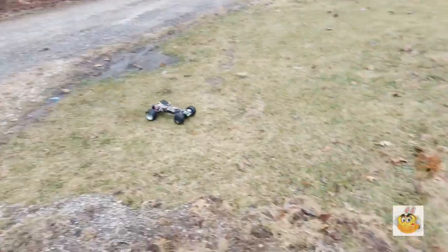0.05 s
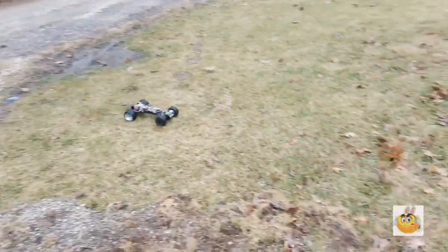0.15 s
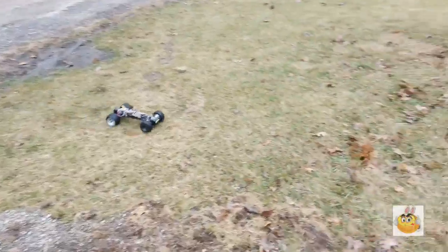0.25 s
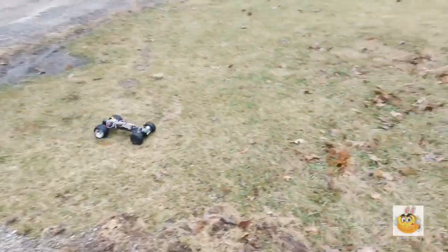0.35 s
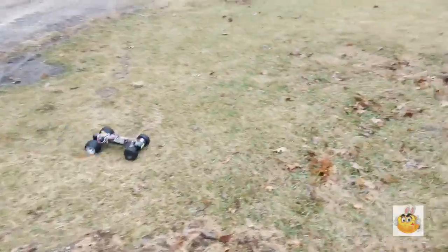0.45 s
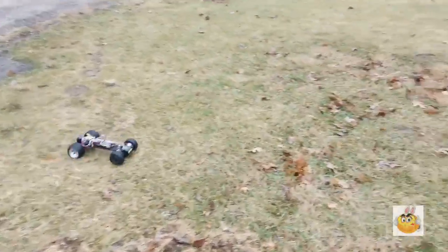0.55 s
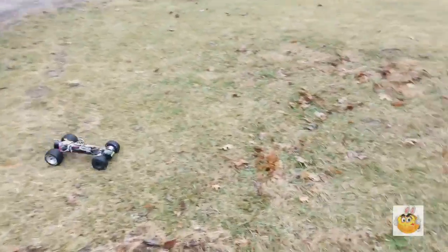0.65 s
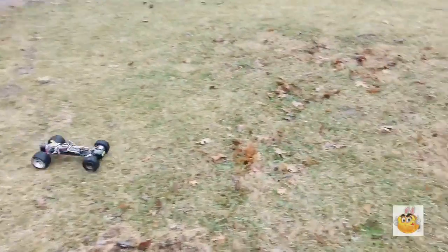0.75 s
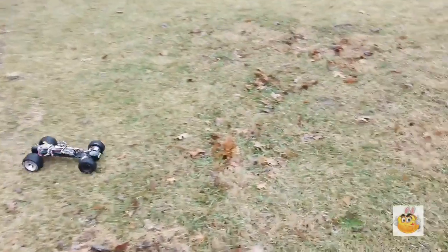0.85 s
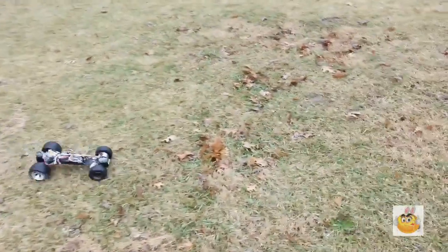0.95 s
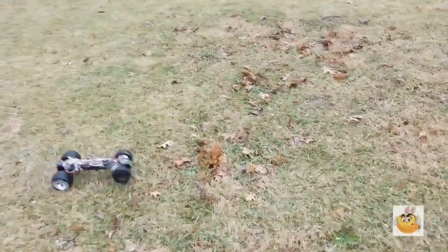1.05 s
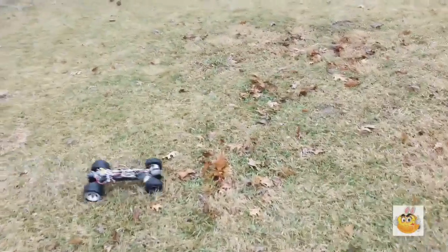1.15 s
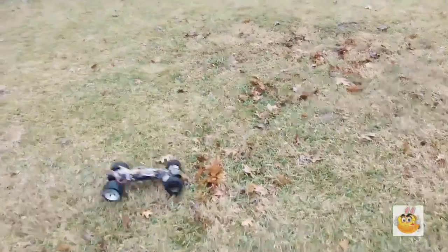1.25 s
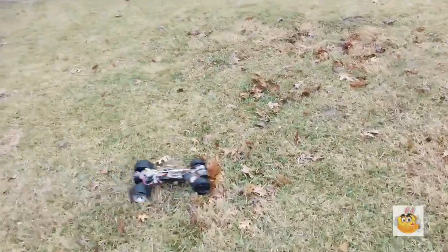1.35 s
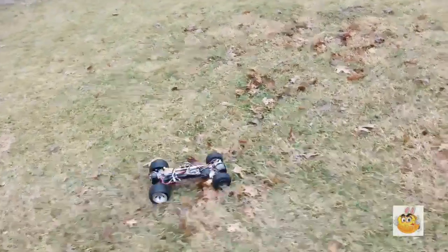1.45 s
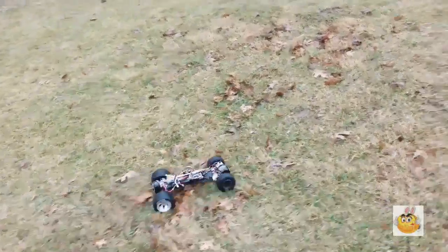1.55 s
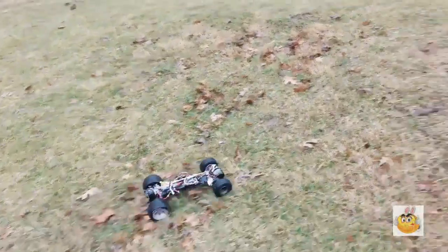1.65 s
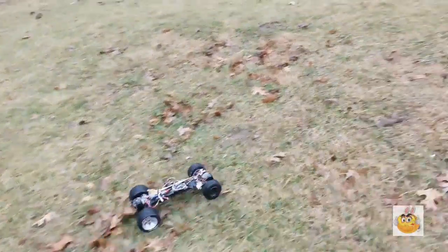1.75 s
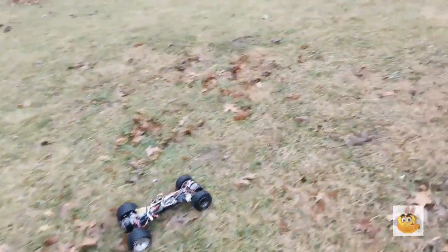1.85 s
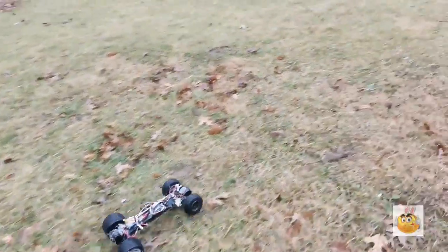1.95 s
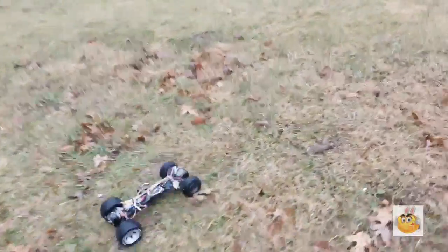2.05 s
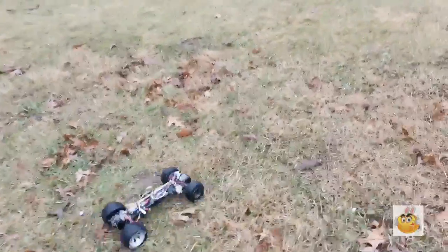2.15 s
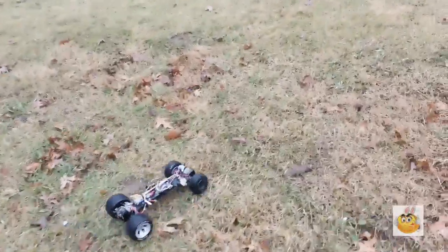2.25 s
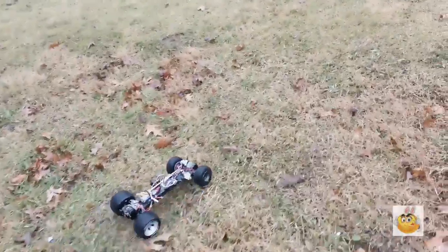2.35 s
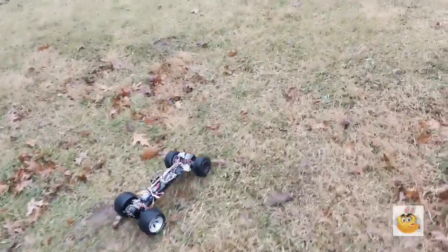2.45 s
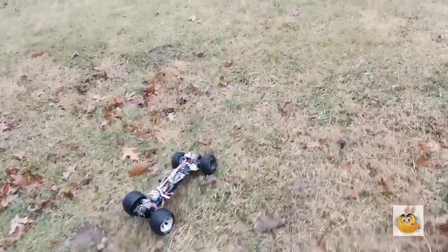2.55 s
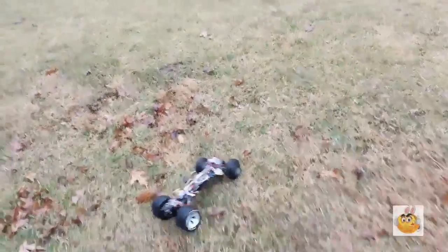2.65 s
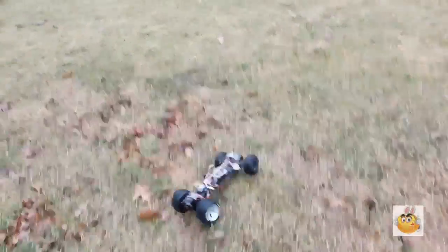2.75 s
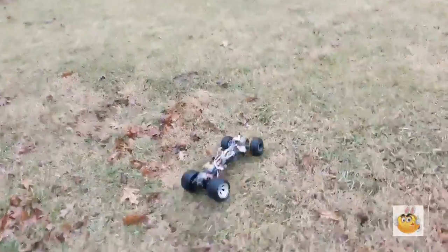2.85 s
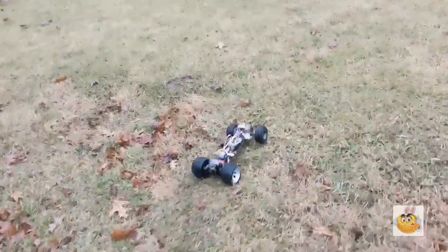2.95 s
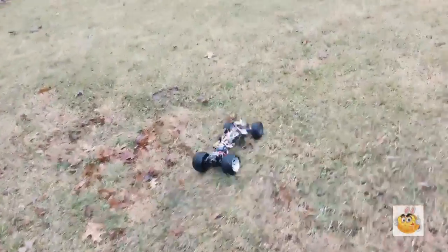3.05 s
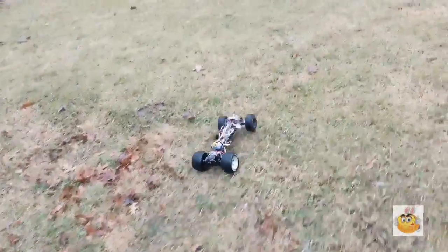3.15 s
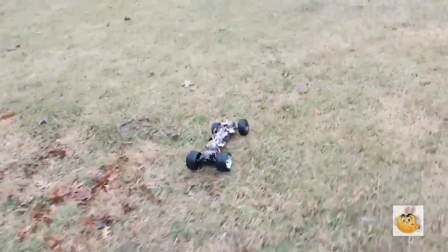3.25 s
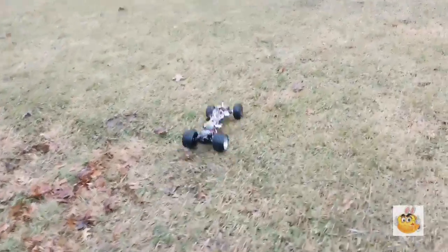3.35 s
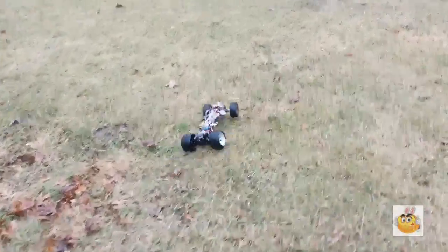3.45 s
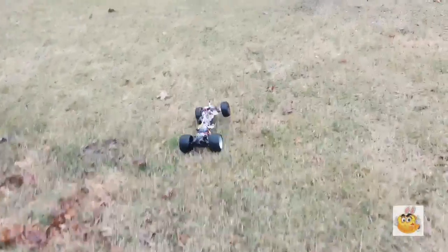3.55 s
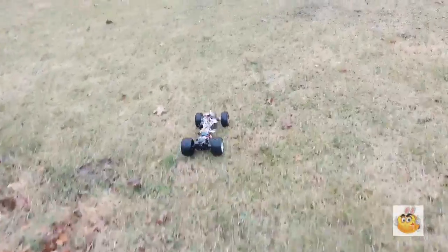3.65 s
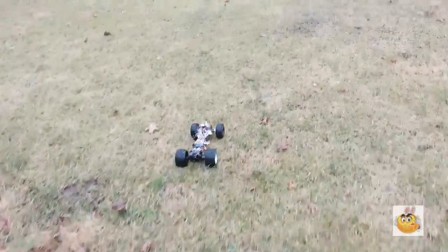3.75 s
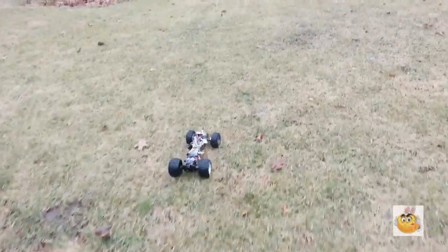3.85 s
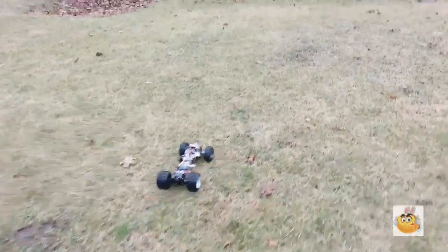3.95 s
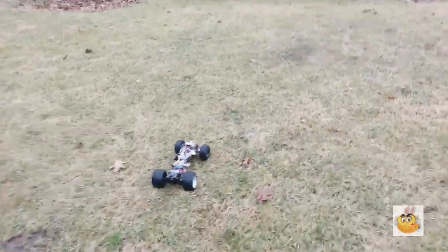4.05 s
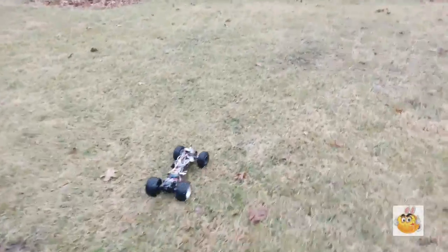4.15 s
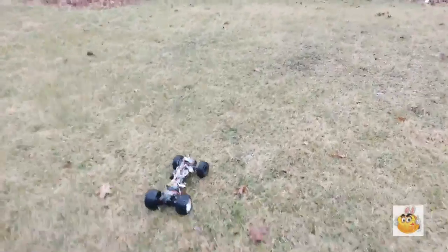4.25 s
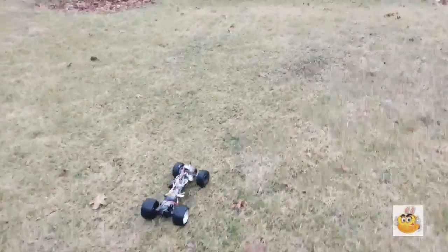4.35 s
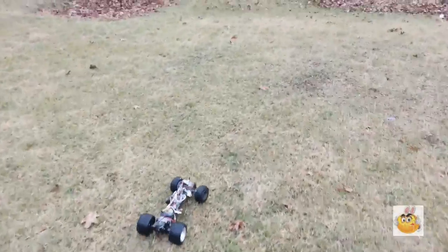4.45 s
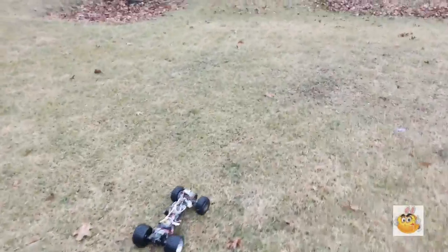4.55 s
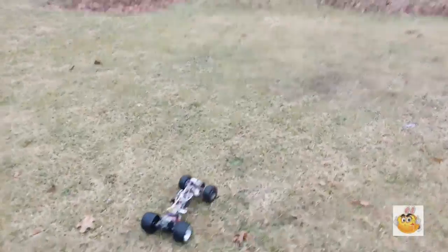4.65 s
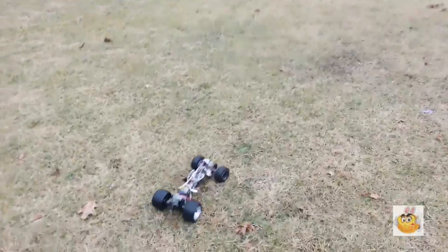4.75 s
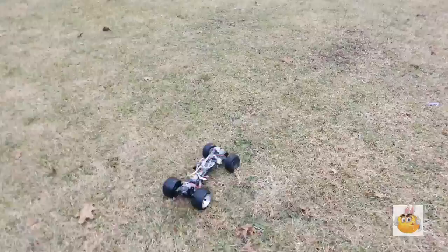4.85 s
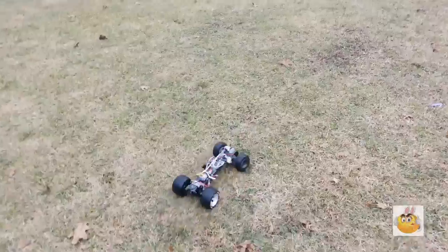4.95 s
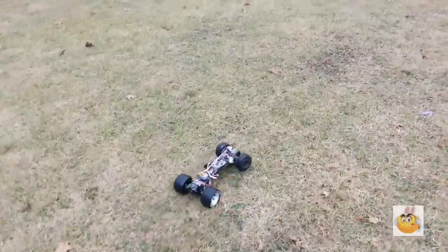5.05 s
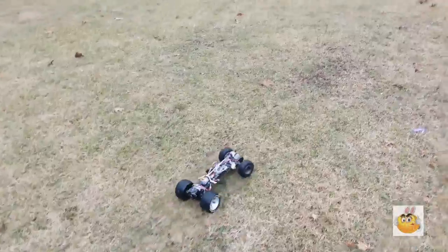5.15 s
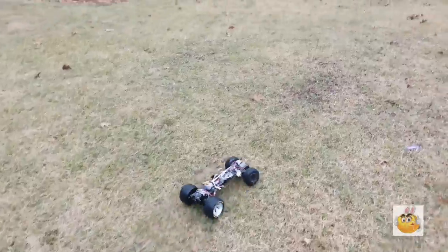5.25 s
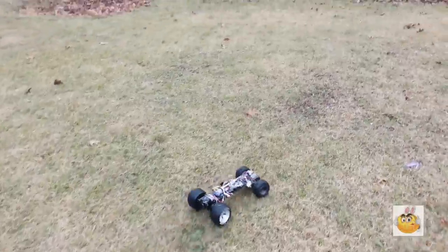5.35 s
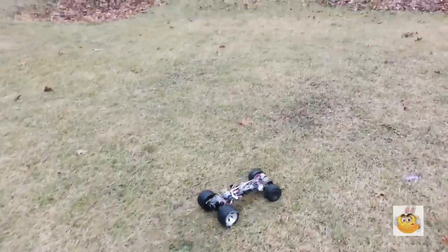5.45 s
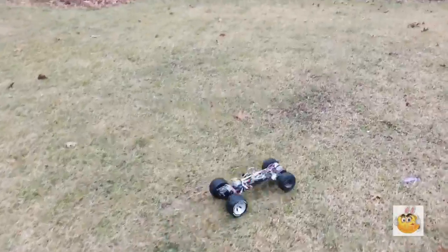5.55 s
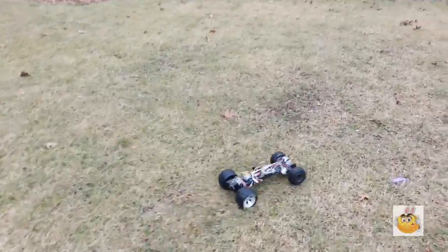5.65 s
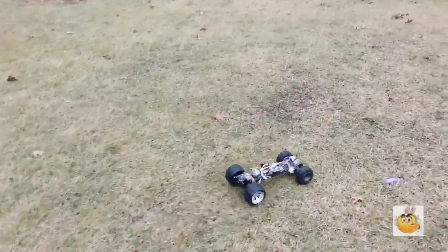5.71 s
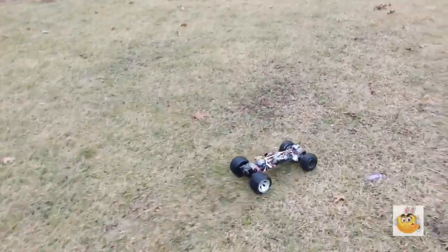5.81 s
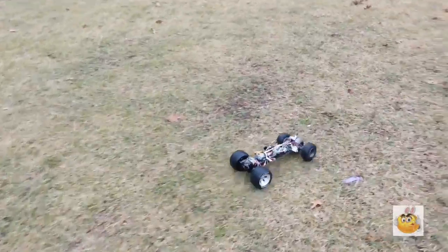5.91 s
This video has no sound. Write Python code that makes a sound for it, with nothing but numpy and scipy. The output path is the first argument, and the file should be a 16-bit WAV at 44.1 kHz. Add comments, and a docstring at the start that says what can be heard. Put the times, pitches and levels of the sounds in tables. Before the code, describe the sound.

A toy-sized electric truck bounces across rough grass. Plastic gears scrape harshly while the motor pitch leaps briefly whenever wheels slip on bumps, with small grit ticks. After its strongest revving it coasts down and almost stops over low, quiet outdoor rumble, then restarts suddenly. Open-air stereo pickup, dry, slightly left, with a brittle ringing edge on the right.

```python
"""Electric model truck on a lawn

A small electric truck bounces over the grass, coasts to a stop and pulls away again.
The motor whines mostly on even orders of its shaft; filtered noise in shaft-timed bursts makes the gear rasp.
Near standstill the speed controller sings faintly over a low outdoor rumble, and a soft hiss passes.
The right microphone port rings in the treble."""
import sys
import numpy as np
from scipy import signal
from scipy.fft import rfft, irfft
from scipy.io import wavfile
from scipy.ndimage import uniform_filter1d, map_coordinates

SR = 44100
rng = np.random.default_rng(int(sys.argv[2]) if len(sys.argv) > 2 else 0)


def unload_wav(signal):
    """Save mono or channel-first audio to the path in sys.argv[1] as 16-bit WAV at rate SR, clipped to [-1, 1]."""
    wavfile.write(
        sys.argv[1],
        SR,
        np.round(np.clip(np.atleast_2d(signal).T, -1, 1) * 32767).astype(np.int16),
    )


N = 263718
TIME = np.arange(N) / SR
FREQS = np.fft.rfftfreq(N, 1 / SR)


def from_db(db):
    """Decibels to gain."""
    return 10 ** (np.asarray(db) / 20)


def unit(x):
    """Scales to an rms of one."""
    return x / np.sqrt(np.mean(x ** 2) + 1e-20)


def follow(table, t=TIME):
    """Columns of a curve table, interpolated at the times t."""
    s, *columns = np.transpose(table)
    return [np.interp(t, s, c) for c in columns]


def at_pitch(table, hz):
    """Reads a spectrum on a log-frequency axis."""
    f, value = np.transpose(table)
    return np.interp(np.log(hz + 1), np.log(f), value)


def colour(x, table):
    """Filters by a spectrum in dB."""
    return irfft(rfft(x) * from_db(at_pitch(table, FREQS)), N)


def wander(rate_hz):
    """Random curve of rms one, low-passed near the given rate."""
    spectrum = rfft(rng.standard_normal(N))
    return unit(irfft(spectrum / (1 + (FREQS / rate_hz) ** 4), N))


def two_sides(likeness):
    """Two noises, alike to a degree set per frequency."""
    a, b = rfft(rng.standard_normal((2, N)))
    c = np.clip(at_pitch(likeness, FREQS), 0, 1)
    right = c * a + np.sqrt(1 - c ** 2) * b
    return irfft(np.array([a, right]), N)


# outdoor background spectrum: freq_hz, relative_level_db
AIR_SPECTRUM = [(20, -37), (32, -25), (50, -14), (86, 1), (110, -2), (129, 2), (160, -3), (250, -7),
                (430, -11), (800, -11), (1800, -16), (3200, -20), (7000, -24), (10000, -28), (13000, -33)]
# likeness of its two sides: freq_hz, likeness_0_to_1
AIR_LIKENESS = [(30, 0.26), (90, 1), (200, 0.86), (500, 0.46), (1500, 0.24), (5000, 0.022)]


def outdoors(level_db=-42, swell_db=2.0, swell_hz=7.1):
    """Distant rumble and a faint wash of open air: coloured noise with random swells."""
    air = unit(colour(two_sides(AIR_LIKENESS), AIR_SPECTRUM))
    return air * from_db(level_db + swell_db * wander(swell_hz))


def swish(level_db=-43):
    """A soft bright hiss while the truck stands: coloured noise under a short swell."""
    # freq_hz, relative_level_db
    spectrum = [(400, -10), (2000, 0), (5000, 3), (7000, -6.5), (10000, -7), (13000, -11)]
    # time_s, relative_level_db
    swell = [(4.5, -63), (4.57, -17), (4.61, 4), (4.66, 4.5), (4.7, -14), (4.78, -64)]
    hiss = unit(colour(rng.standard_normal((2, N)), spectrum))
    return hiss * from_db(level_db + follow(swell)[0])


# wheel slips on humps: crest_s, extra_turns_per_s, half_length_s, extra_whine_db
WHEEL_SLIPS = [(.06, 55, .075, 7), (.975, 100, .035, 0), (1.07, 70, .055, 0), (1.185, 125, .055, -2),
               (1.33, 115, .035, 0), (1.495, 105, .04, 0), (1.615, 135, .058, 2), (1.72, 75, .035, 2),
               (1.79, 55, .028, 0), (1.99, 85, .055, -1), (2.15, 70, .055, 3), (2.45, 65, .06, 5),
               (2.565, 230, .042, 1), (2.655, 180, .038, 0), (2.707, 215, .03, 5), (2.795, 115, .048, 7),
               (2.9, 190, .058, 5), (2.992, 255, .038, 4), (3.1, 230, .06, 5), (3.175, 130, .03, 4),
               (3.265, 130, .04, 6), (3.36, 190, .035, 7), (3.495, 130, .03, 1), (3.542, 175, .04, 1),
               (3.69, 55, .06, 0), (4.875, 95, .055, 4), (5.12, 45, .04, 7), (5.2, 70, .035, 3),
               (5.295, 50, .04, 4), (5.425, 115, .048, 3), (5.58, 90, .05, 6), (5.715, 70, .045, 1),
               (5.81, 50, .028, 1), (5.922, 115, .05, 3)]
SLIP_ARCH = 1.6  # exponent: 1 pointed crest, 2 round


def whoops():
    """Each slip is one arch that lifts shaft speed and whine: (turns per second, dB)."""
    crest_s, extra_turns, half_length_s, whine_db = np.transpose(WHEEL_SLIPS)[:, :, None]
    arch = 1 - np.minimum(abs(TIME - crest_s) / half_length_s, 1) ** SLIP_ARCH
    return np.max(extra_turns * arch, axis=0), np.sum(whine_db * arch, axis=0)


# motor shaft while the wheels grip: time_s, turns_per_s
GRIP_SPEED = [(0, 555), (.14, 510), (.33, 490), (.72, 390), (.94, 395), (1.38, 505), (1.55, 480),
              (1.94, 465), (2.09, 435), (2.21, 365), (2.36, 365), (2.61, 415), (2.84, 515), (3.03, 560),
              (3.25, 680), (3.375, 610), (3.4, 450), (3.425, 600), (3.6, 470), (3.78, 370), (4.1, 295),
              (4.41, 80), (4.75, 80), (4.81, 400), (4.95, 330), (5.16, 420), (5.34, 445), (5.39, 375),
              (5.63, 360), (5.67, 480), (5.98, 455)]
SWAY_SHARE, SWAY_HZ = .018, 18  # rough lawn
TREMBLE_SHARE, TREMBLE_HZ = .011, 60  # gear play


def shaft():
    """Shaft speed from throttle, wheel slips, lawn sway and gear tremble; its integral is the angle."""
    unevenness = 1 + SWAY_SHARE * wander(SWAY_HZ) + TREMBLE_SHARE * wander(TREMBLE_HZ)
    speed = (follow(GRIP_SPEED)[0] + whoops()[0]) * unevenness
    return speed, 2 * np.pi * np.cumsum(speed) / SR


def racing_db(speed):
    """How far the shaft runs above its mean speed over the surrounding 0.2 s."""
    return 20 * np.log10(speed / uniform_filter1d(speed, size=8800, mode="nearest"))


def spinning(speed, stall_turns_per_s=260):
    """Near one while the shaft turns freely, falling to zero at rest."""
    return 1 / (1 + (stall_turns_per_s / speed) ** 6)


# hard bumps that load (+) or unload (-) the gears: time_s, change_db, half_length_s
JOLTS = [(0.084, 3.5, 0.014), (0.341, -5, 0.0086), (1.474, -8, 0.0057), (1.611, 4.5, 0.0049),
         (1.66, 6.5, 0.01), (1.814, 5, 0.012), (2.059, -5, 0.016), (2.372, -5.5, 0.026),
         (2.491, -8.5, 0.025), (2.599, -8, 0.011), (2.687, -3.5, 0.0089), (3.197, 4.5, .0093),
         (3.286, 4, 0.0092), (3.336, 7, 0.0059), (3.373, 7.5, 0.0085), (3.404, 6, 0.0079),
         (3.45, 7.5, 0.0073), (3.836, -12, 0.0023), (3.977, 6, 0.0097), (4.466, 10, 0.0057),
         (5.573, 5, 0.012), (5.639, -1, 0.006)]
JUDDER_DB, JUDDER_HZ = 1.5, 28  # small random bumps, rms


def surge_db(speed, power=0.46):
    """Quick changes of effort: racing shaft, hard bumps and a judder of small ones."""
    bumps = 0
    for time_s, db, half_length_s in JOLTS:
        bumps = bumps + db * np.exp(-np.minimum(((TIME - time_s) / half_length_s) ** 2, 20))
    return power * racing_db(speed) + bumps + JUDDER_DB * wander(JUDDER_HZ)


# switching tone: freq_hz, rms_db at standstill
SWITCHING_TONES = [(980, -54.5), (1960, -66)]


def controller(speed, blur_rad=0.34, blur_hz=23):
    """The speed controller's pulses sing in the windings while the shaft is nearly still."""
    tone = 0
    for hz, db in SWITCHING_TONES:
        phase = 2 * np.pi * hz * TIME + blur_rad * wander(blur_hz)
        tone = tone + from_db(db) * unit(np.sin(phase))
    return tone * (1 - spinning(speed))


# likeness of the two sides for rasp and ticks: freq_hz, likeness_0_to_1
RASP_LIKENESS = [(150, 0), (500, 0.13), (2300, 0.96), (4000, 0.55), (7000, 0.36), (12000, 0.08)]
# radiation of gear case and chassis: freq_hz, gain_db
CHASSIS_RADIATION = [(100, -17.5), (300, -16.5), (550, -14), (900, -11.5), (1400, -12), (2200, -6.5),
                     (2750, 3), (3400, -2.5), (4600, 1.5), (5900, -3), (6800, -3), (8000, -10.5),
                     (9600, -12.5), (11000, -19), (12600, -21.5), (13800, -66)]
# grit and stalks on the chassis: start_s, relative_level_db
GRIT_TICKS = [(1.5958, -15), (2.6199, -10), (2.6597, -5), (3.9754, -18), (4.1762, -22), (4.2143, -18),
              (5.3308, -6), (5.5834, -13)]


def ticks(level_db=-3, decay_s=.0006):
    """Grit and stalks tap the chassis: short decaying noise, coloured by what it radiates."""
    taps = np.zeros(N)
    for start_s, db in GRIT_TICKS:
        age_s = np.maximum(TIME - start_s, 0)
        taps += from_db(db + level_db) * (age_s > 0) * np.exp(-np.minimum(age_s / decay_s, 20))
    return colour(two_sides(RASP_LIKENESS) * taps, CHASSIS_RADIATION)


# rasp colour as the truck turns: time_s, body_db, ring_near_2700_hz_db, low_treble_db
FACING = [(0, -1.5, -2, 0.5), (.3, -3, 2.5, 0), (.85, 1, 2, -1.5), (1.35, 0.5, 0.5, 3.5),
          (1.9, 0, -5, -0.5), (2.4, 0, -1.5, 3), (3.6, 1, -4, -2.5), (4.1, 5.5, -1, 0), (4.85, 11.5, 5, 2),
          (5.1, 0, 0, -0.5), (5.98, 1, -1.5, -3.5)]


def turn_colour(x, patch_db=2.2):
    """Broad bands swell and fade as the truck turns; random patches of time and pitch vary gently in level."""
    hz, t, z = signal.stft(x, SR, nperseg=512)
    # per band: freq_hz, share
    body = [(1800, 1), (2500, 0)]
    ring = [(2000, 0), (2700, 1), (3400, 0)]
    low_treble = [(3400, 0), (4100, 1), (5400, 1), (6500, 0)]
    tilt_db = 0
    for shape, db in zip([body, ring, low_treble], follow(FACING, t)):
        tilt_db = tilt_db + at_pitch(shape, hz)[:, None] * db
    patches = uniform_filter1d(rng.standard_normal(z.shape[1:]), size=3, axis=0)
    patches_db = patch_db * unit(uniform_filter1d(patches, size=5, axis=1))
    return signal.istft(z * from_db(tilt_db + patches_db), SR, nperseg=512)[1][:, :N]


# drive train loudness, from throttle and distance: time_s, relative_level_db
DRIVE_LOAD = [(0, -24), (.9, -22.5), (1.5, -19), (2.1, -17), (2.25, -22.5), (2.4, -19.5), (2.68, -14),
              (2.85, -15.5), (3.1, -13.5), (3.35, -20.5), (3.6, -19), (3.97, -24.5), (4.3, -37),
              (4.42, -51), (4.77, -41), (4.8, -34.5), (5.05, -19.5), (5.55, -19.5), (5.98, -17.5)]


def gears(angle, surge, level_db=-4.5, wobble=0.13, mesh=0.24, chatter_db=0.0, chatter_hz=260,
          body_share=0.5, body_hz=1500):
    """Teeth scrape in bursts, once and twice a shaft turn; the chassis colours the rasp."""
    chatter = from_db(chatter_db * wander(chatter_hz))  # flat at 0 dB
    bursts = (1 + wobble * np.cos(angle) + mesh * np.cos(2 * angle)) * chatter
    scrape = two_sides(RASP_LIKENESS) * bursts
    rasp = turn_colour(unit(colour(scrape, CHASSIS_RADIATION)))
    # low body follows surges less than the scraping treble
    body = irfft(rfft(rasp) / (1 + (FREQS / body_hz) ** 4), N)
    rasp = body * from_db(body_share * surge) + (rasp - body) * from_db(surge)
    return rasp * from_db(level_db + follow(DRIVE_LOAD)[0])


# bounce off the ground: time_s, delay_ms, strength
GROUND_BOUNCE = [(.05, .1, 0), (.25, .15, .45), (.6, .19, .45), (.9, .215, .4), (1.2, .235, .3),
                 (1.6, .27, 0)]


def ground_echo(x):
    """A slightly later copy off the lawn combs the sound; the comb slides down as the truck nears."""
    delay_ms, strength = follow(GROUND_BOUNCE)
    late = np.arange(N) - delay_ms * SR / 1000
    echo = np.array([map_coordinates(side, [late], order=3) for side in x])
    return (x + strength * echo) / np.hypot(1, strength)


def partial(angle, blur_rad, shimmer_db=3.8):
    """One shaft order, broken up in level and phase by the uneven contact of the teeth."""
    shimmer = from_db(shimmer_db * wander(45))
    return unit(shimmer * np.cos(angle + blur_rad * wander(67)))


def ringing(x, share=.4, decay_s=.003):
    """Plastic parts ring on for milliseconds, so a sweeping tone flickers differently on each side."""
    age_s = np.arange(1024) / SR
    rings = rng.standard_normal((2, len(age_s))) * np.exp(-age_s / decay_s)
    rings /= np.linalg.norm(rings, axis=1, keepdims=True)
    tail = signal.oaconvolve(x[None], rings, axes=1)[:, :N]
    return (x + share * tail) / np.hypot(1, share)


# whine against the drive train loudness: time_s, relative_level_db
WHINE_LEVEL = [(0, -21), (.2, -19), (.5, -25), (1.1, -23), (1.6, -14.5), (2.35, -18), (2.7, -15.5),
               (3.1, -19.5), (3.5, -17), (3.9, -24), (4.85, -19), (5.3, -18), (5.98, -20)]
# even orders on the mount: shaft_order, relative_level_db at MID_TURNS_PER_S, rise_db_per_doubling
MOUNT_ORDERS = [(2, -8, 9), (4, -.5, 9), (6, 0, -6)]
# fringe of further orders: shaft_order, relative_level_db
FRINGE_ORDERS = [(3, -8.5), (5, -37), (7, -14), (8, -29), (10, 1), (12, -17.5)]
# motor mount resonances: freq_hz, gain_db
MOUNT_RESONANCE = [(700, 5), (1150, -1), (1330, -2), (1550, 1), (1800, -2), (2150, 2), (2400, 3), (2680, 7),
                   (3100, -5), (4000, -5)]
MID_TURNS_PER_S = 500


def motor(speed, angle, surge, fringe_db=-2):
    """Three even orders follow the mount resonances, with a fringe of further orders; crests sing out."""
    doublings = np.log2(speed / MID_TURNS_PER_S)
    whine = 0
    for order, db, rise_db in MOUNT_ORDERS:
        order_db = db + rise_db * doublings + at_pitch(MOUNT_RESONANCE, order * speed)
        whine = whine + from_db(order_db) * partial(order * angle, blur_rad=.35)
    for order, db in FRINGE_ORDERS:
        whine = whine + from_db(db + fringe_db) * partial(order * angle, blur_rad=0.7)
    effort_db = whoops()[1] + .8 * np.minimum(racing_db(speed), 2) + .3 * surge - 1.2
    level_db = follow(DRIVE_LOAD)[0] + follow(WHINE_LEVEL)[0] + effort_db
    return ringing(whine * spinning(speed) * from_db(level_db))


# truck position: time_s, left_minus_right_db, left_delay_ms
TRUCK_PLACE = [(0, 3, 0.086), (.7, 2.5, 0.16), (1.8, 2.5, 0.1), (2.6, 3, 0.13), (3.2, 3.5, 0.052),
               (3.8, 3, 0.07), (4.8, 3.5, 0.089), (5.9, 4, 0.022)]


def place(x):
    """Pans the truck by level and lets it reach the left side a little later."""
    pan_db, delay_ms = follow(TRUCK_PLACE)
    left = map_coordinates(x[0], [np.arange(N) - delay_ms * SR / 1000], order=3)
    return np.array([left * from_db(pan_db / 2), x[1] * from_db(-pan_db / 2)])


def scene():
    """The truck on the lawn, over the outdoor background."""
    background = outdoors() + swish()
    speed, angle = shaft()
    surge = surge_db(speed)
    rasp = ground_echo(ticks() + gears(angle, surge))
    truck = controller(speed) + rasp + motor(speed, angle, surge)
    return background + place(truck)


# right microphone port against the left: freq_hz, gain_db
RIGHT_PORT = [(300, 1), (1500, 2.35), (2300, 0), (3200, -4), (4100, -1), (5300, 2.8), (6100, 7),
              (6650, 16.5), (7250, 19), (7700, 12.5), (8400, 9), (10000, 7), (12500, 6.5)]
EDGE_HZ = 13800


def record(dry, ceiling=.9):
    """The ringing right port, a soft limit on the highest peaks, then the band limit."""
    heard = np.array([dry[0], colour(dry[1], RIGHT_PORT)])
    heard = heard / (1 + (heard / ceiling) ** 6) ** (1 / 6)
    lowpass = signal.firwin(255, EDGE_HZ, window=("kaiser", 9), fs=SR)
    return signal.oaconvolve(heard, lowpass[None], "same")


dry = scene()
out = record(dry)
unload_wav(out)
```